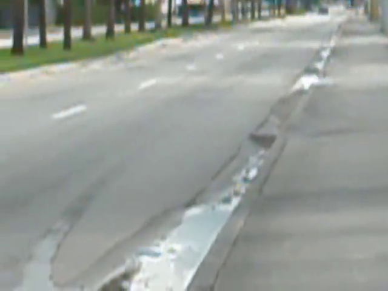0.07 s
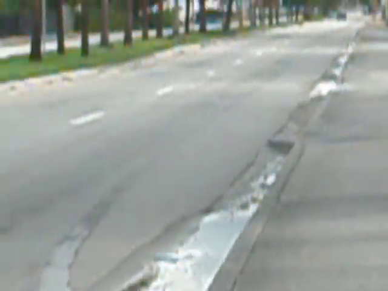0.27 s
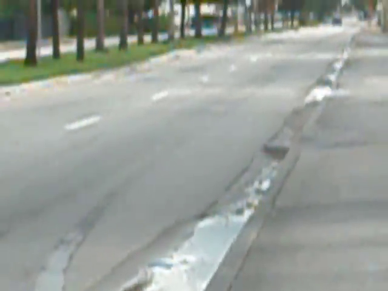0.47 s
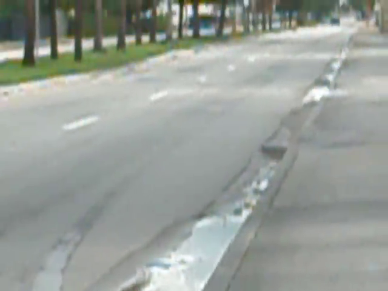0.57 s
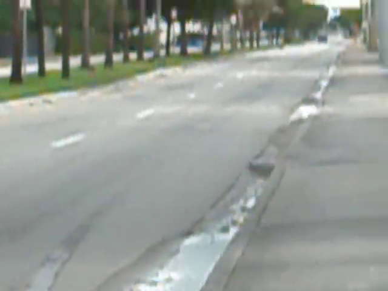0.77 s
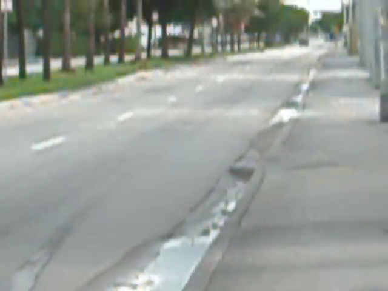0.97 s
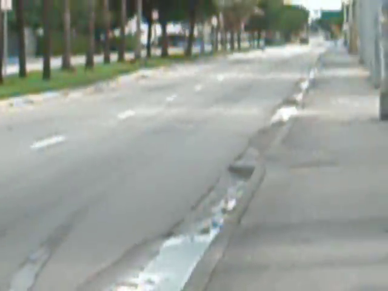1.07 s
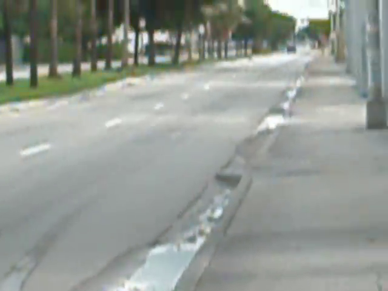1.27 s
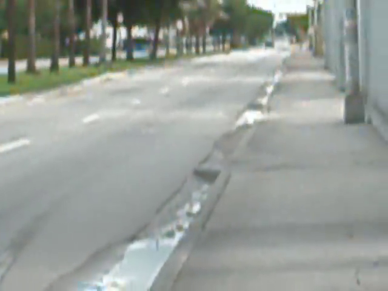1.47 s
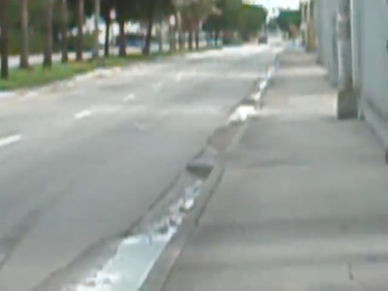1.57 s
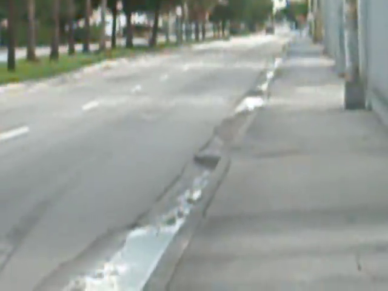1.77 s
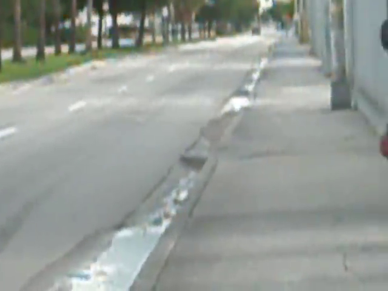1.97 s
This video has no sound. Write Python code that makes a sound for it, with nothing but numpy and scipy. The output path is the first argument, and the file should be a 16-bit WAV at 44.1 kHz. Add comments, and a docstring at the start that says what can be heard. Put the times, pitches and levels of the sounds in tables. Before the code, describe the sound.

A car engine runs close by for the whole two seconds, stuttering in raspy exhaust pops at an even pitch over a faint whining hiss. Thin metallic squeals and a brief screech sound in the first 0.6 seconds, then return from about 1.1 seconds. A faint low hum stops at 0.5 seconds as soft street rumble swells. The sound is dull, with the hardest pops slightly distorted.

```python
"""A rotary engine runs close by on a street, stuttering "brap" from start to end: six of every twelve
firing slots fire, and each pop rings the exhaust pipe and tears a rasp of gas from its mouth.
At first, squeals and a screech rise over hissing, whining machinery. Half a second in, the street rumble
swells and a low hum stops. Near one second the hum is briefly back, then the screech and squeals return.
Throughout, a small microphone cuts the treble and clips on the hardest pops."""
import sys
import numpy as np
from scipy import signal
from scipy.fft import rfft, irfft
from scipy.io import wavfile

SR = 44100
rng = np.random.default_rng(int(sys.argv[2]) if len(sys.argv) > 2 else 0)


def bounce(signal):
    """Save signal as a 16-bit WAV file at the path given by the first command-line argument."""
    frames = np.transpose(np.atleast_2d(signal))
    limited = np.clip(frames, -1, 1)
    pcm = np.round(limited * 32767).astype(np.int16)
    wavfile.write(sys.argv[1], SR, pcm)


N = 88596

# tone colour of the street rumble: f/Hz, relative level/dB
RUMBLE_SPECTRUM = [(22, -13), (45, -6.5), (70, 3.5), (95, 4), (130, -3), (180, -20)]
# how loud the rumble is: t/s, level/dB
RUMBLE_LOUDNESS = [(0, -44), (.55, -33.5), (.8, -36.5), (1.3, -35), (1.6, -37), (2.01, -37)]
# how loud the low hum is: t/s, level/dB
HUM_LOUDNESS = [(0, -29), (.5, -28.5), (.54, -60), (1.0, -60), (1.04, -29), (1.09, -29), (1.13, -60),
                (2.01, -60)]
# faint, steady whines: f/Hz, level/dB
WHINE_TONES = [(2044, -39), (2557, -41), (2716, -43), (3011, -38), (3346, -40), (3632, -37), (3998, -43),
               (4358, -44)]
# tone colour of the screech: f/Hz, relative level/dB
SCREECH_SPECTRUM = [(2600, -20), (2800, 8.5), (3250, -2), (3700, -10.5), (4000, -4.5), (4300, -13)]
# how loud the screech is: t/s, level/dB
SCREECH_LOUDNESS = [(0, -37), (.15, -23.5), (.25, -39), (1.0, -41), (1.12, -24), (1.28, -34), (1.4, -21.5),
                    (1.5, -35), (2.01, -29)]
# metallic squeals: start t/s, length/s, start f/Hz, end f/Hz, relative level/dB
SQUEAL_EVENTS = [(.03, .18, 3330, 3570, -30), (.07, .1, 3632, 3625, -24), (.09, .1, 4000, 4005, -31),
                 (.26, .22, 3635, 3650, -25), (.495, .135, 3018, 3020, -20), (.52, .13, 4020, 4010, -28),
                 (1.31, .14, 3150, 3900, -27), (1.385, .08, 3650, 3650, -23), (1.5, .075, 3635, 3632, -21),
                 (1.67, .09, 3612, 3625, -27), (1.775, .09, 3636, 3636, -21), (1.83, .085, 3026, 3026, -25)]
# tone colour of the running machinery: f/Hz, relative level/dB
MACHINERY_SPECTRUM = [(120, -20.5), (230, 3.5), (340, 7.5), (480, -22), (580, -6.5), (900, 2), (1250, 2),
                      (1700, -11.5), (2020, -2), (2400, -7.5), (2800, -2.5), (3400, -1.5), (3700, -0.5),
                      (4000, -14.5), (4500, -14)]
# tone colour of gas tearing at the pipe's mouth: f/Hz, relative level/dB
RASP_SPECTRUM = [(600, -5), (1000, 0), (1300, -13), (1700, -8.5), (2000, 2.5), (2400, -22), (2850, 7.5),
                 (3150, 4.5), (3600, 7.5), (3950, -5.5), (4400, -15)]
# how rasp and machinery rise and fall together: t/s, relative level/dB
HISS_LOUDNESS = [(0, 7), (.15, -2), (.4, 2), (.55, 2.5), (.75, 1.5), (.95, 2), (1.15, -1), (1.42, 2),
                 (1.7, 3), (2.01, 6.5)]
# rounds of twelve firing slots, each ending where the next begins: start t/s, relative level/dB
FIRING_ROUNDS = [(-.0659, 2), (.0767, -.5), (.2192, 0.5), (.3626, 2), (.5064, 2.5), (.6515, -.5),
                 (.7971, 1.5), (.9434, 2.5), (1.0904, 0), (1.2381, 1), (1.3863, 0), (1.5348, 1),
                 (1.6844, 1.5), (1.8354, 0.5), (1.9858, 6), (2.137, 0)]
# the slots that fire in a round: slot number, counted from 0
LIVE_SLOTS = [0, 2, 4, 5, 7, 9]
# the six pops of a round: relative thump level/dB, relative rasp level/dB
POP_ACCENTS = [(0.5, -0.5), (-1.5, -2), (-2.5, -2), (-2, -1), (-4, -7.5), (-5, -4)]
# deep ringing of the pipe and silencer: f/Hz, width/Hz, relative level/dB
BOOM_MODES = [(205.8, 20.6, 21), (249.3, 20.3, 27), (326.4, 27.6, 23), (458.2, 29.9, 27),
              (473.2, 17.3, 28.5)]
# how the boom rises and falls: t/s, relative level/dB
BOOM_LOUDNESS = [(0, 6), (.4, 2.5), (.8, 3), (1.3, 3), (1.7, 2), (2.01, 2.5)]
# barking ring of the tailpipe: f/Hz, width/Hz, relative level/dB
BARK_MODES = [(827, 41, 17.5), (868.2, 70, 27.5), (912, 48.5, 31), (1025.6, 25.2, 25.5)]
# metallic overtones of the pipe: f/Hz, width/Hz, relative level/dB
METAL_MODES = [(1163, 13, 10.5), (1224, 20, 20), (1589, 24.5, 25), (2028, 32, 14.5), (3126, 83, 12),
               (3591, 810, 15.5)]


def from_db(db):
    """Turn decibels into a number to multiply by."""
    return 10 ** (np.asarray(db) / 20)


def rms_one(x):
    """Scale a signal so that its average strength (rms) is 1."""
    return x / np.sqrt(np.mean(x ** 2) + 1e-20)


def level(rows):
    """A volume curve joining points of t/s, level/dB."""
    return from_db(np.interp(np.arange(N) / SR, *np.transpose(rows)))


def drift(rate_hz):
    """A smooth random wobble of strength 1; a higher rate wobbles faster."""
    r = np.exp(-2 * np.pi * rate_hz / SR)
    return rms_one(signal.lfilter([1], [1, -2 * r, r * r], rng.standard_normal(N + SR))[SR:])


def noise(spectrum):
    """Noise of strength 1, coloured by points of f/Hz, level/dB."""
    hz, db = np.transpose(spectrum)
    log_hz = np.log(np.arange(N // 2 + 1) * SR / N + 1)
    gain = from_db(np.interp(log_hz, np.log(hz), db, left=-np.inf, right=-np.inf))
    return rms_one(irfft(rfft(rng.standard_normal(N)) * gain, N))


def clicks(times, db):
    """One click of the given strength at each time."""
    out = np.zeros(N)
    inside = (times >= 0) & (times < (N - 1) / SR)
    np.add.at(out, (times[inside] * SR).astype(int), from_db(db[inside]))
    return out


def fade(x, decay_s):
    """Give each click a tail that dies away."""
    return signal.lfilter([1], [1, -np.exp(-1 / (decay_s * SR))], x + 1e-18)


def smear(x, decay_s):
    """Spread each click into a dying tail with the same energy."""
    return fade(x, decay_s) / np.sqrt(decay_s * SR / 2)


def late(x, delay_s):
    """Delay a signal."""
    return np.interp(np.arange(N) - delay_s * SR, np.arange(N), x, left=0)


def resonance(x, hz, width_hz):
    """Ring at one pitch; the narrower the width, the longer it rings."""
    r = np.exp(-np.pi * width_hz / SR)
    feedback = [1, -2 * r * np.cos(2 * np.pi * hz / SR), r * r]
    return signal.lfilter(np.array([1, 0, -1]) * (1 - r * r) / 2, feedback, x)


def ring(drive, modes, polarity=1):
    """Ring at several pitches (modes); a negative polarity makes neighbours swing against each other."""
    return sum(polarity ** k * from_db(db) * resonance(drive, hz, width)
               for k, (hz, width, db) in enumerate(modes))


def whistle(hz, wander_hz=8.2, rough_db=1.2):
    """A tone of strength 1 that wavers in pitch and loudness."""
    phase = 2 * np.pi * np.cumsum(hz + wander_hz * drift(19.4)) / SR
    return rms_one(np.sin(phase) * from_db(rough_db * drift(43)))


def street_rumble():
    """The low noise of the street."""
    return level(RUMBLE_LOUDNESS) * noise(RUMBLE_SPECTRUM)


def hum(hz=75.4):
    """A low tone that stops and briefly returns."""
    return level(HUM_LOUDNESS) * rms_one(np.sin(2 * np.pi * hz * np.arange(N) / SR))


def whines():
    """The machinery whistles faintly at several high pitches."""
    return sum(from_db(db) * whistle(hz) for hz, db in WHINE_TONES)


def screech():
    """A high, breathy noise that swells now and then."""
    return level(SCREECH_LOUDNESS) * noise(SCREECH_SPECTRUM)


def squeals(fade_s=.02, boost_db=1):
    """Each metallic squeal fades in, holds or slides in pitch, and fades out."""
    out, t = np.zeros(N), np.arange(N) / SR
    for start, length, from_hz, to_hz, db in SQUEAL_EVENTS:
        end = start + length
        envelope = np.clip(np.minimum(t - start, end - t) / fade_s, 0, 1)
        pitch_hz = np.interp(t, [start, end], [from_hz, to_hz])
        out += from_db(db + boost_db) * envelope * whistle(pitch_hz)
    return out


def machinery(gain_db=-26, flicker_db=2.5):
    """The broad, flickering hiss of the running engine."""
    return from_db(gain_db + flicker_db * drift(36)) * noise(MACHINERY_SPECTRUM)


def firings(slots=12, jitter_s=.00004, thump_spread_db=1.64, rasp_spread_db=3.4):
    """When each pop fires and how hard it thumps and rasps, all varied a little by chance."""
    starts, round_db = np.transpose(FIRING_ROUNDS)
    offsets = np.diff(starts)[:, None] * np.array(LIVE_SLOTS) / slots
    times = (starts[:-1, None] + offsets).ravel()
    thump_db, rasp_db = [(round_db[:-1, None] + accent).ravel() for accent in np.transpose(POP_ACCENTS)]
    chance = rng.standard_normal((len(times), 3))
    return (times + jitter_s * chance[:, 0],
            thump_db - thump_spread_db * chance[:, 1],
            rasp_db - rasp_spread_db * chance[:, 2])


def afterburn(gain_db=-10.5, delay_s=.0011):
    """Fuel left by skipped slots burns on after each round's first pop and makes the tailpipe bark."""
    starts, db = np.transpose(FIRING_ROUNDS)
    flare = smear(clicks(starts + delay_s, db + gain_db), decay_s=.012)
    return ring(flare * rng.standard_normal(N), BARK_MODES + METAL_MODES)


def rasp(times, db, gain_db=-14, tail_db=-15, delay_s=.00061):
    """Gas tears out of the pipe's mouth after each pop: a sharp crack with a softer tail."""
    pops = clicks(times + delay_s, db)
    crack = fade(pops, decay_s=.0018)
    tail = from_db(tail_db) * fade(pops, decay_s=.019)
    return from_db(gain_db) * (crack + tail) * noise(RASP_SPECTRUM)


def exhaust(times, db, gush_db=-14, flow_db=-39.5):
    """Each pop's jolt of pressure and gush of swirling gas ring the pipe, on top of a steady flow."""
    pops = clicks(times, db)
    gush = from_db(gush_db) * smear(pops, decay_s=.012)
    drive = pops + (gush + from_db(flow_db)) * rng.standard_normal(N)
    bark = ring(drive, BARK_MODES)
    overtones = late(ring(drive, METAL_MODES, polarity=-.85), delay_s=.0004863)
    boom = level(BOOM_LOUDNESS) * late(ring(drive, BOOM_MODES), delay_s=.00073)
    return boom - bark + overtones


def scene():
    """The engine and the street as heard from the kerb, in one channel."""
    times, thump_db, rasp_db = firings()
    pipe = exhaust(times, thump_db) + afterburn()
    hiss = level(HISS_LOUDNESS) * (rasp(times, rasp_db) + machinery())
    shrill = squeals() + screech() + whines()
    return (pipe + hiss + shrill + hum() + street_rumble())[None]


def record(dry, overload=.64, treble_hz=4128, clip_at=.72, top_hz=16000):
    """The small microphone overloads and loses treble; leftover peaks clip and the very top is cut."""
    overloaded = np.clip(dry, -overload, overload)
    dull = signal.sosfilt(signal.butter(20, treble_hz, fs=SR, output="sos"), overloaded)
    clipped = np.clip(dull, -clip_at, clip_at)
    return signal.sosfilt(signal.ellip(10, .1, 80, top_hz, fs=SR, output="sos"), clipped)


dry = scene()
out = record(dry)
bounce(out)
```